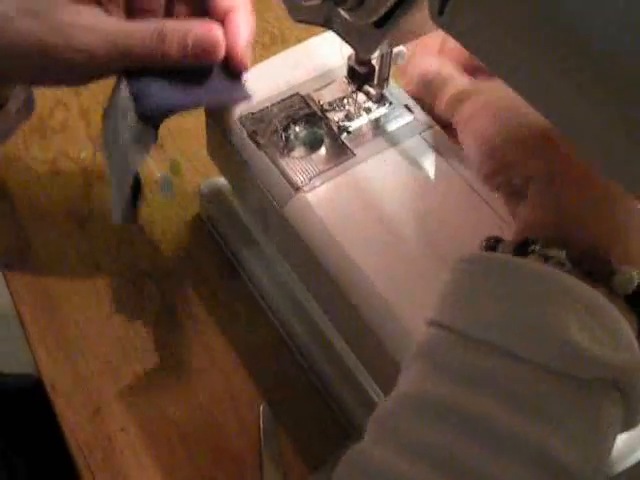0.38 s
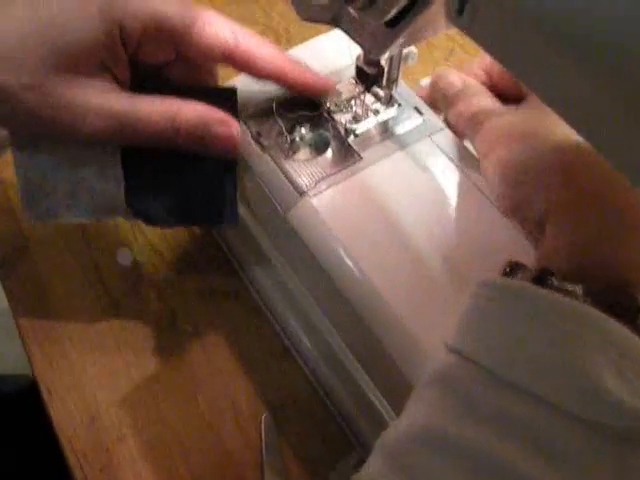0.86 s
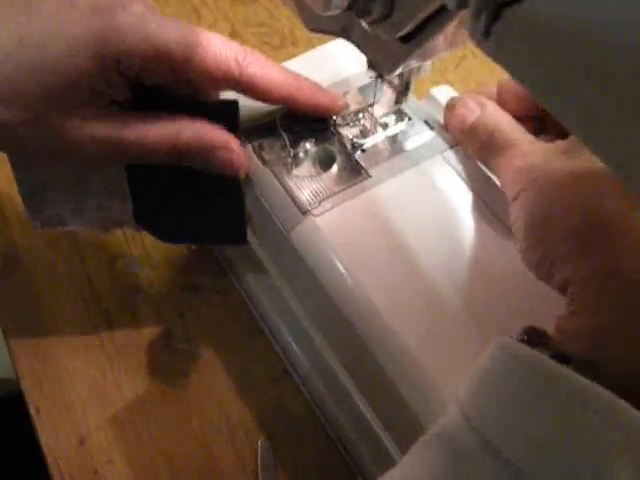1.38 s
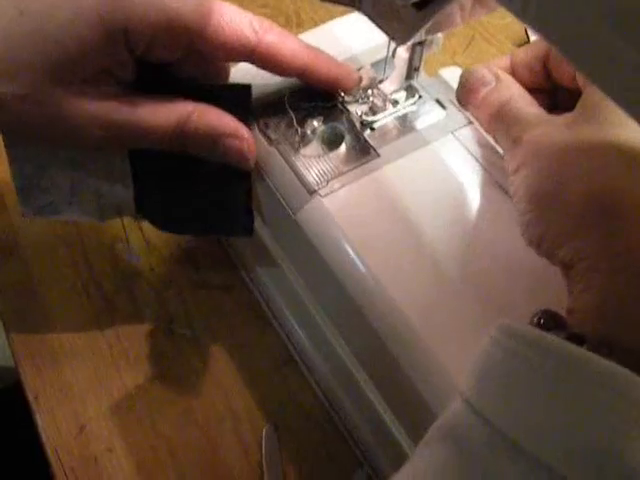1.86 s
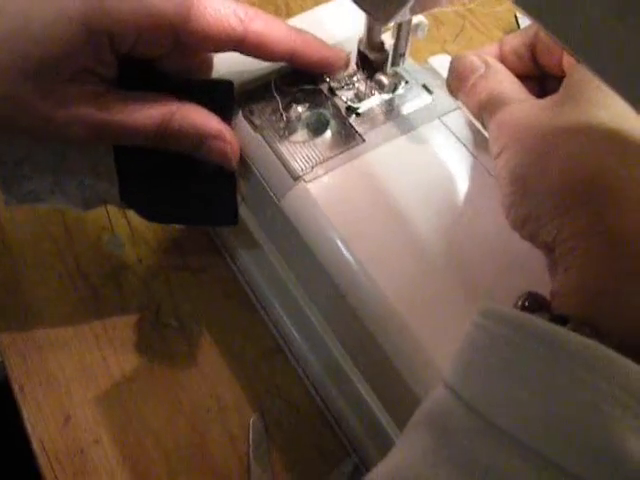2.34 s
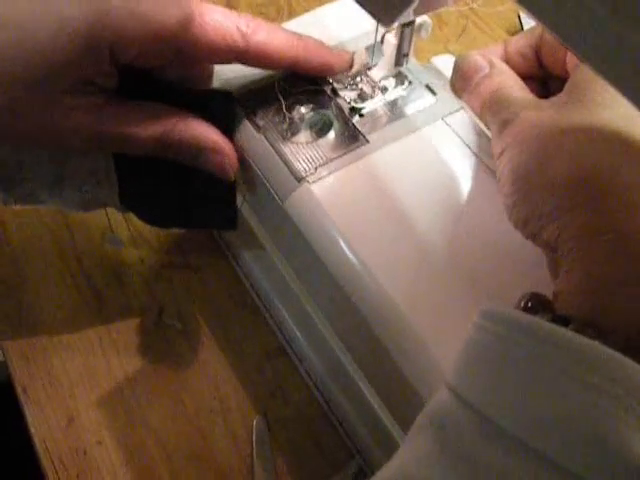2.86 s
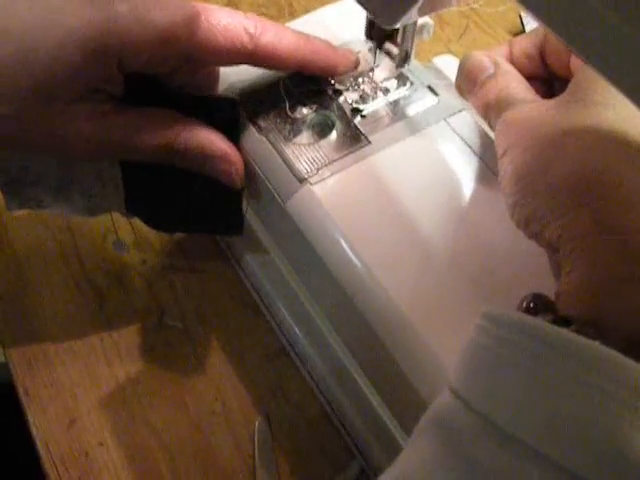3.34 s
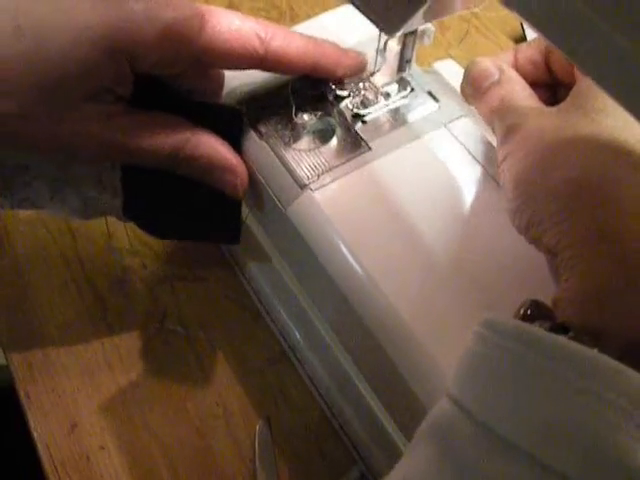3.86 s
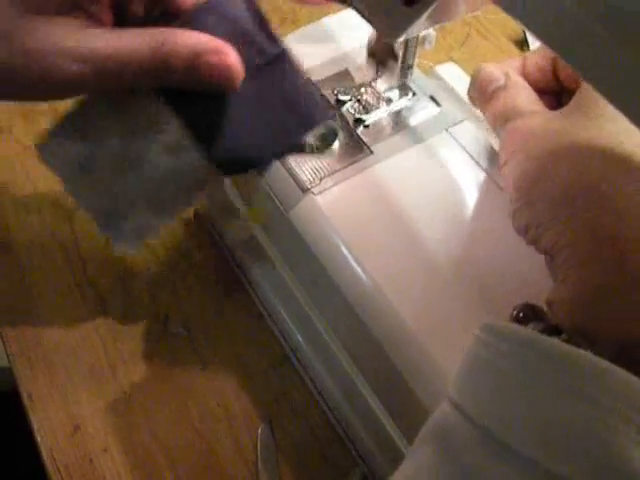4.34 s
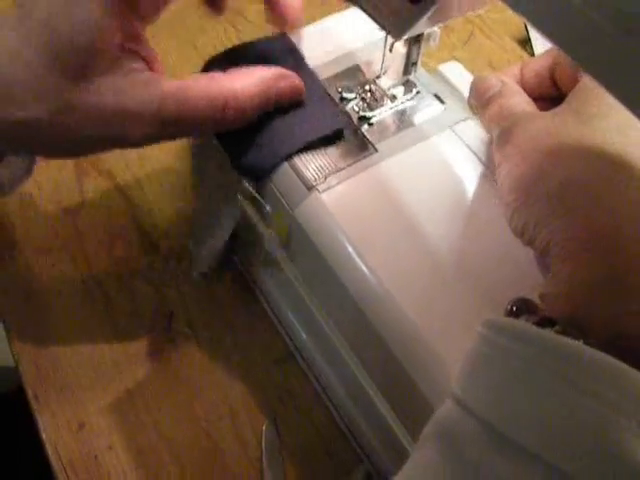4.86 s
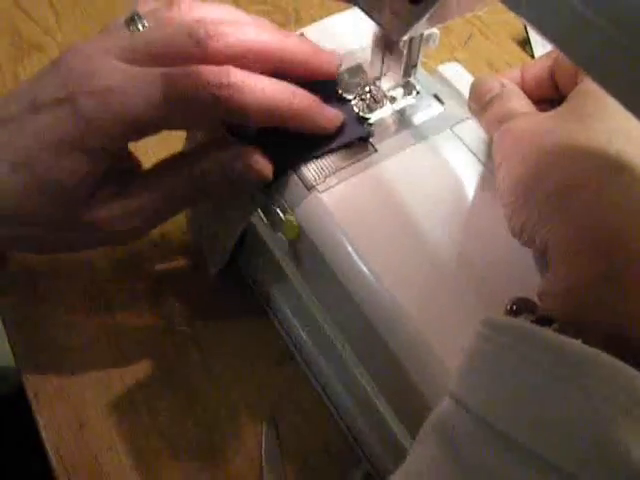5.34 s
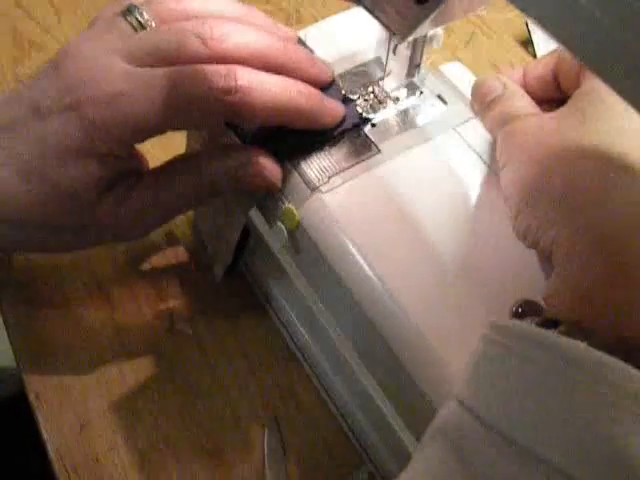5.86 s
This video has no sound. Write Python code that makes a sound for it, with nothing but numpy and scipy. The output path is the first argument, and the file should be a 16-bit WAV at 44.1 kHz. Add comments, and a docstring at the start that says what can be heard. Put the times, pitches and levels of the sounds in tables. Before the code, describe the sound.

Hissy lo-fi close-up of a small sewing machine: slow knocks and rubbing, then three short motor bursts with gliding whine, rattle and metallic stitch clacks.

```python
"""On a wooden table, close to a microphone with a coarse 8-bit, 8 kHz input: a small sewing machine.
First its mechanism is moved slowly and knocks and rubs; then the motor runs three short bursts.
A toothed drive whines (a gliding tone that surges), the works rattle the housing (impacts and noise
through resonances), and needle and hook clack at every stitch (short rough contacts that ring).
Under it lie a faint boom of the table, a short room tail and steady hiss."""
import sys
import numpy as np
from scipy import signal
from scipy.fft import rfft, irfft
from scipy.io import wavfile

SR = 44100
rng = np.random.default_rng(int(sys.argv[2]) if len(sys.argv) > 2 else 0)


def amp(db):
    return 10 ** (np.asarray(db, float) / 20)


def materialize(psi):
    """Save the field psi as 16-bit PCM at rate SR to the path in sys.argv[1].

    A 1-D psi becomes a single channel; in a 2-D psi each row is a channel.
    """
    bounded = np.clip(np.atleast_2d(psi).T, -1, 1)
    quanta = np.round(bounded * 32767).astype(np.int16)
    wavfile.write(sys.argv[1], SR, quanta)


N = 274302

# single blows into housing and table: (time [s], peak level [dB], main ring [Hz], t60 [s])
THUMP_BLOWS = [(0.127, -36.5, 542, 0.066), (0.658, -34, 492, 0.22), (0.767, -35.5, 363, 0.17),
               (0.834, -34, 558, 0.2), (0.856, -33.5, 552, 0.15), (1.08, -24, 875, 0.24),
               (1.089, -27.5, 719, 0.28), (1.221, -33, 688, 0.092), (1.548, -20.5, 870, 0.077),
               (1.563, -13.5, 523, 0.13), (1.682, -23.5, 567, 0.098), (1.786, -28, 646, 0.14),
               (1.918, -27.5, 790, 0.11), (2.194, -23.5, 960, 0.054), (2.199, -19.5, 494, 0.099),
               (2.449, -23.5, 630, 0.033), (2.456, -24.5, 278.7, 0.14), (2.735, -31, 303, 0.13),
               (3.102, -25.5, 552, 0.15), (3.251, -20, 830, 0.057), (3.257, -22.5, 448, 0.12),
               (3.314, -24, 553, 0.13), (3.329, -25.5, 285.7, 0.2), (3.415, -29.5, 299, 0.19),
               (3.565, -27.5, 350, 0.063), (3.685, -19, 293, 0.14), (4.146, -25.5, 860, 0.06),
               (4.196, -22, 576, 0.044), (5.05, -25.5, 260, 0.29), (5.122, -27, 896, 0.13),
               (5.282, -26.5, 525, 0.072), (5.928, -32, 744.4, 0.091)]
# resonances of housing and table: (frequency [Hz], width [Hz], level [dB])
HOUSING_MODES = [(265.8, 50, -1), (327, 70, -1.5), (386, 88, -2), (518, 90, -3), (604.4, 60, -0.5),
                 (774, 65, -0.5), (901.5, 80, -3.5), (1112, 110, -6), (1460, 200, -11)]
# resonances of the metal works: (frequency [Hz], width [Hz], level [dB])
METAL_MODES = [(1466, 94, -3), (1750, 170, -3.5), (2175, 200, -3), (2691, 450, -4.5), (3006, 400, -6),
               (3842, 520, -3)]
# one list a motor run: (time [s], tooth rate of the drive [Hz], whine level before surge and housing [dB])
MOTOR_RUNS = [
    [(3.66, 248.6, -38), (3.726, 509, -24.5), (3.756, 629, -18.5), (3.798, 778, -26), (3.852, 911, -12),
     (3.9, 920.4, -24), (3.952, 1013, -18.5), (3.988, 879, -17.5), (4.028, 722, -14.5),
     (4.078, 494.6, -30.5), (4.108, 364.6, -26.5), (4.16, 244.6, -28.5)],
    [(4.31, 243, -26), (4.348, 308, -33.5), (4.389, 653, -17.5), (4.436, 587.7, -22), (4.49, 500.6, -25.5),
     (4.558, 426, -18), (4.61, 413.4, -32), (4.665, 403, -18), (4.732, 379.4, -29), (4.781, 441, -41.5),
     (4.844, 630, -18.5), (4.89, 707, -24.5), (4.931, 610, -18), (4.955, 373, -28), (4.985, 275.6, -22),
     (5.01, 255, -25.5)],
    [(5.51, 223, -33.5), (5.554, 393, -25), (5.597, 583, -17.5), (5.648, 785, -14), (5.697, 895, -13),
     (5.745, 968, -19), (5.79, 999, -14), (5.83, 1019, -25), (5.885, 980, -10.5), (5.935, 967.5, -16.5),
     (6.0, 961, -21.5), (6.088, 955.4, -17), (6.17, 901, -15), (6.22, 812, -14)],
]
# the hook clacks once a stitch: (time [s], peak level [dB], main ring [Hz])
HOOK_CLACKS = [(3.8084, -19, 2410), (3.9484, -9, 1712), (4.139, -21, 3376), (4.5013, -16, 2490),
               (4.782, -19, 2439), (4.9601, -10.5, 2354), (5.654, -8.5, 2326), (5.7852, -8, 2452),
               (5.909, -11, 2590), (6.0328, -10, 2654), (6.1576, -12, 2410)]
FULL_HZ = 903  # tooth rate that counts as full speed


def evened(x):
    """Scales a signal to rms 1."""
    return x / np.sqrt(np.mean(x ** 2) + 1e-20)


def add(mix, s, sound):
    """Adds a sound into the mix, in place, from s seconds on."""
    part = mix[round(s * SR):][:len(sound)]
    part += sound[:len(part)]


def resonate(x, hz, width):
    """A two-pole resonance of gain about 1 at hz."""
    r = np.exp(-np.pi * width / SR)
    return signal.lfilter([1 - r, 0, r - 1], [1, -2 * r * np.cos(2 * np.pi * hz / SR), r * r], x)


def body(x, modes):
    """Rings all modes of one object, neighbours in opposite phase."""
    return sum((-1) ** k * amp(db) * resonate(x, hz, width) for k, (hz, width, db) in enumerate(modes))


def wobble(count, hz):
    """Random wander of rms 1, mostly slower than hz."""
    f = np.fft.rfftfreq(count, 1 / SR)
    return evened(irfft(rfft(rng.standard_normal(count)) / (1 + (f / hz) ** 4), count))


def air():
    """Steady hiss of room and preamplifier: noise shaped by a smooth spectrum."""
    # spectrum of the hiss: (frequency [Hz], relative level [dB per Hz])
    hiss_curve = [(24, -52), (40, -24.5), (196, -3), (342, -15), (1780, -10), (2320, -7), (3900, -11),
                  (5070, -39), (8580, -120)]
    f, level_db = np.transpose(hiss_curve)
    hz = np.fft.rfftfreq(N, 1 / SR)
    colour = amp(np.interp(np.log(hz + 1), np.log(f + 1), level_db))
    return amp(-52) * evened(irfft(rfft(rng.standard_normal(N)) * colour, N))


def room(x, t60=0.23):
    """A short diffuse tail from table and walls: decaying noise that starts after 4 ms."""
    t = np.arange(SR // 3) / SR
    tail = rng.standard_normal(len(t)) * amp(-60 * t / t60) * (t > 0.004)
    return signal.fftconvolve(x, tail / np.linalg.norm(tail))[:N]


def table_boom(rumble_db):
    """The table booms faintly near 115 Hz, about half as many dB up and down as the rumble."""
    boom = evened(resonate(resonate(rng.standard_normal(N), 115, 60), 115, 60))
    return amp(-71 + 0.49 * (rumble_db + 48)) * boom


def shaft():
    """Tooth rate [Hz], spinning up and coasting down around each run, and the count of teeth passed."""
    spin_up_s, coast_s = 0.027, 0.074
    points = []
    for run in MOTOR_RUNS:
        points.append((run[0][0] - spin_up_s, 1))  # 1 Hz stands for rest
        points.extend(row[:2] for row in run)
        points.append((run[-1][0] + coast_s, 1))
    hz = np.interp(np.arange(N) / SR, *np.transpose(points))
    return hz, np.cumsum(hz) / SR


def motion():
    """Rumble and rattle levels [dB]: powers of rest, motor, rubbing parts and shaking add up."""
    # parts moved by hand: (time of the peak [s], rise [s], fall [s], housing rumble [dB], metal rattle [dB])
    rubs = [(0.005, 0.055, 0.049, -39, -57.5), (0.14, 0.053, 0.045, -53, -60), (0.5, 0.22, 0.12, -57, -52),
            (0.818, 0.12, 0.19, -42.5, -47.5), (1.299, 0.07, 0.11, -47, -52), (1.748, .1, 0.29, -43, -50),
            (2.021, 0.16, .16, -35.5, -44), (2.482, 0.15, 0.33, -38.5, -44.5),
            (2.85, 0.027, 0.085, -41.5, -53), (3.01, 0.054, 0.043, -38.5, -50.5),
            (3.201, 0.17, 0.089, -35, -42), (3.345, .08, 0.055, -33, -49), (3.471, 0.043, 0.2, -44.5, -49),
            (4.288, 0.084, 0.055, -35.5, -43), (5.172, 0.2, 0.087, -37.5, -44.5),
            (5.298, 0.029, 0.13, -40, -42.5), (5.46, 0.076, 0.04, -42, -46)]
    t = np.arange(N) / SR
    hz, teeth = shaft()

    # the works strain as the needle goes in: a swell 6.5 teeth ahead of the hook
    load = 0
    for s, _, _ in HOOK_CLACKS:
        past_load = teeth - teeth[round(s * SR)] + 6.5
        load = load + np.exp(-0.5 * (past_load / 23) ** 2)  # width in teeth
    octaves = np.log2(hz / FULL_HZ) * np.where(hz > 1, 1, 10)  # silences the motor at rest
    motor_rumble_db = -23 + 7 * octaves + 3.5 * load
    motor_rattle_db = -33.5 + 6 * octaves + 4 * load
    rumble = amp(2 * -55) + amp(2 * motor_rumble_db)  # amp(2 * dB) is a power
    rattling = amp(2 * -66.5) + amp(2 * motor_rattle_db)

    for s, rise_s, fall_s, rumble_db, rattle_db in rubs:
        shape_db = -10.5 * np.maximum((s - t) / rise_s, (t - s) / fall_s)
        rumble = rumble + amp(2 * (rumble_db + shape_db))
        rattling = rattling + amp(2 * (rattle_db + shape_db))

    # a thump leaves the loose parts shaking: rise 0.02 s, t60 0.3 s, levels below the thump's peak
    for s, peak_db, _, _ in THUMP_BLOWS:
        shake = amp(2 * (peak_db - 60 * abs(t - s) / 0.3)) * np.clip((t - s) / 0.02, 0, 1)
        rumble = rumble + amp(2 * -15) * shake
        rattling = rattling + amp(2 * -28.5) * shake
    return 10 * np.log10(rumble), 10 * np.log10(rattling)


def rattle(modes, per_s, spread_db, smooth, flutter_db):
    """Small random impacts over a rubbing noise, heard through an object's modes."""
    hits = (rng.random(N) < per_s / SR) * rng.choice([-1., 1.], N)
    hits = hits * amp(spread_db * np.minimum(rng.exponential(1, N), 3))
    drive = smooth * rng.standard_normal(N) + evened(hits)
    flutter = amp(flutter_db * wobble(count=N, hz=26.4))
    return evened(body(drive * flutter, modes))


def works(rumble_db, rattle_db):
    """The housing rumbles and the metal rattles while anything moves."""
    dull_modes = [(f, width, db - 2.9 * np.log2(f / 600)) for f, width, db in HOUSING_MODES]
    dull = rattle(dull_modes, per_s=250, spread_db=2.0, smooth=1.6, flutter_db=2.0)
    bright = rattle(HOUSING_MODES, per_s=370, spread_db=0.5, smooth=1.5, flutter_db=1.63)
    # loud motion drives the upper modes harder: crossfade from -38 to -30 dB
    vigour = np.clip((rumble_db + 38) / 8, 0, 1)
    housing = np.sqrt(1 - vigour) * dull + np.sqrt(vigour) * bright
    metal = rattle(METAL_MODES, per_s=300, spread_db=1.0, smooth=1.7, flutter_db=1.75)
    return amp(rumble_db) * housing + amp(rattle_db) * metal


def whine(rows, first_surge_teeth):
    """Teeth mesh at the drive's rate; the tone surges once a wheel turn, wavers and rings the housing."""
    wheel_teeth = 29.3
    s, hz, level_db = np.transpose(rows)
    t = np.arange(s[0], s[-1], 1 / SR)
    rate = np.interp(t, s, hz)
    cycles = np.cumsum(rate * (1 + 0.018 * wobble(count=len(t), hz=70))) / SR
    wheel_turns = (np.cumsum(rate) / SR - first_surge_teeth) / wheel_teeth
    surge = 0.2 + abs(np.cos(np.pi * wheel_turns)) ** 1.2
    tone = np.sin(2 * np.pi * cycles) + amp(-20) * np.sin(4 * np.pi * cycles)
    tone = tone * amp(np.interp(t, s, level_db)) * surge
    tone = tone * signal.windows.tukey(len(t), 0.05)
    return 0.84 * tone + 0.27 * body(tone, HOUSING_MODES)


def blows(events, modes, rise_s, contact_s, share, narrow_db, spill):
    """Each blow is a short rough contact; it rings one pitch, the modes near it, and cracks a little."""
    out = np.zeros(N)
    t = np.arange(SR // 4) / SR
    rise = np.minimum(1, t / rise_s)
    for s, peak_db, hz, t60 in events:
        fade = amp(-60 * t / t60)
        push = rng.standard_normal(len(t)) * (np.exp(-t / contact_s) + 0.66 * fade) * rise
        # modes weaken by narrow_db an octave away from the main ring
        near = [(f, width, db - narrow_db * abs(np.log2(f / hz))) for f, width, db in modes]
        crack = spill * resonate(push, 1800, 2400)
        rough = body(push, near) + crack
        ring = np.sin(2 * np.pi * hz * t) * fade * rise
        sound = share * ring + (1 - share) * rough / abs(rough).max()
        add(out, s, amp(peak_db) * sound / abs(sound).max())
    return out


def around_stitches(after_teeth, full_db, ring_hz, t60):
    """One blow a stitch, a set number of teeth after the hook, 10.5 dB harder an octave of speed."""
    hz, teeth = shaft()
    at = np.searchsorted(teeth, [teeth[round(s * SR)] + after_teeth for s, _, _ in HOOK_CLACKS])
    return [(k / SR, full_db + 10.5 * np.log2(hz[k] / FULL_HZ), ring_hz, t60) for k in at if k < N]


def thumps():
    """Dull blows into housing and table: single ones, and the needle's at every stitch."""
    needle = around_stitches(after_teeth=-41, full_db=-13, ring_hz=589.5, t60=0.24)
    return blows(THUMP_BLOWS + needle, HOUSING_MODES, rise_s=0.0012, contact_s=0.0029,
                 share=0.36, narrow_db=5.5, spill=0.068)


def clacks():
    """Bright metal blows: single ones, then at each stitch the needle, a tick, the hook and the feed."""
    # needle bar, levers and feed: (time [s], peak level [dB], main ring [Hz])
    single_clacks = [(0.019, -31, 2335), (0.251, -27, 2664), (0.6629, -31.5, 1407), (1.0814, -32, 1616),
                     (1.2186, -31, 1314), (1.404, -41, 1300), (1.5613, -29, 1460), (1.685, -27, 2580),
                     (1.7884, -28.5, 2407), (1.928, -37, 2200), (1.956, -27.5, 2200), (2.1933, -27.5, 1990),
                     (2.3311, -22, 4020), (2.3804, -32, 1255), (2.4475, -21, 3460), (3.0999, -30, 2580),
                     (3.1206, -24, 2350), (3.249, -23, 3810), (3.5638, -23.5, 2173), (3.769, -16, 1460),
                     (4.05, -24.5, 3450), (4.1629, -39, 1750), (4.1966, -33, 2400), (4.271, -26, 3900),
                     (4.286, -25, 3420), (4.305, -36, 3450), (4.5523, -15.5, 2510), (4.735, -21, 2286),
                     (5.188, -31, 2240), (5.2851, -24, 2276), (6.1934, -15.5, 2370)]
    events = [(s, db, hz, 95 / hz) for s, db, hz in single_clacks]  # 95 cycles to -60 dB
    events += around_stitches(after_teeth=-34, full_db=-19, ring_hz=2175.5, t60=0.1)  # needle
    events += around_stitches(after_teeth=-9.5, full_db=-15.5, ring_hz=3847, t60=0.008)  # pickup tick
    events += [(*row, 0.038) for row in HOOK_CLACKS]  # t60 in s
    events += around_stitches(after_teeth=41, full_db=-21.5, ring_hz=1548, t60=0.008)  # feed
    return blows(events, METAL_MODES, rise_s=0.002, contact_s=0.004, share=0.42, narrow_db=11.5, spill=0.14)


def scene():
    """All parts of the machine, its table and room, and the hiss."""
    # for each run: (teeth from its start to a surge)
    first_surges = [8.6, 1.9, 10.1]
    rumble_db, rattle_db = motion()
    machine = works(rumble_db, rattle_db)
    for rows, first_surge_teeth in zip(MOTOR_RUNS, first_surges):
        add(machine, rows[0][0], whine(rows, first_surge_teeth))
    machine = machine + thumps() + clacks()
    machine = machine + amp(-13.5) * room(machine)
    # the microphone picks up little of the machine's bass
    thin = signal.butter(4, 185, "highpass", fs=SR, output="sos")
    return (signal.sosfilt(thin, machine) + table_boom(rumble_db) + air())[None]


def roll_off(x):
    """The treble ends steeply here."""
    return signal.sosfilt(signal.butter(12, 15970, fs=SR, output="sos"), x)


def record(dry):
    """Sampled at 8 kHz and cut to 8 bits; each sample is held, which mirrors the sound into the treble."""
    steps = 128  # on each side of zero
    coarse = signal.resample_poly(dry, 80, 441, axis=1)
    coarse = np.floor(np.clip(coarse, -1, 1) * steps) / steps  # rounding down leaves a small offset
    held = coarse[:, np.arange(N) * 80 // 441]
    held = signal.filtfilt(signal.firwin(201, 15650, fs=SR), 1, held)
    return roll_off(held)


dry = scene()
out = record(dry)
materialize(out)
```